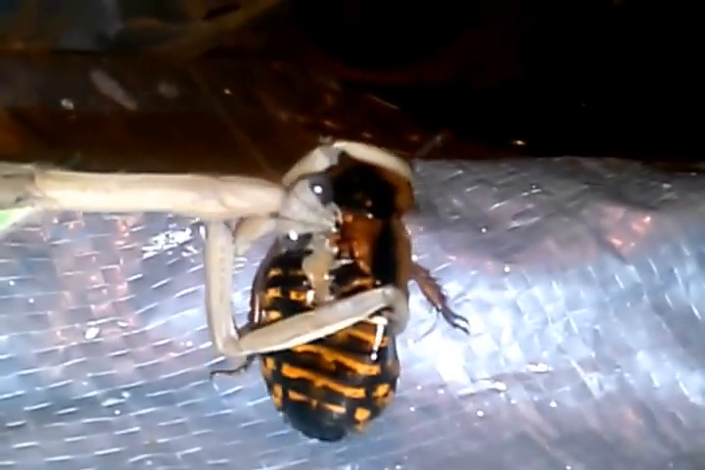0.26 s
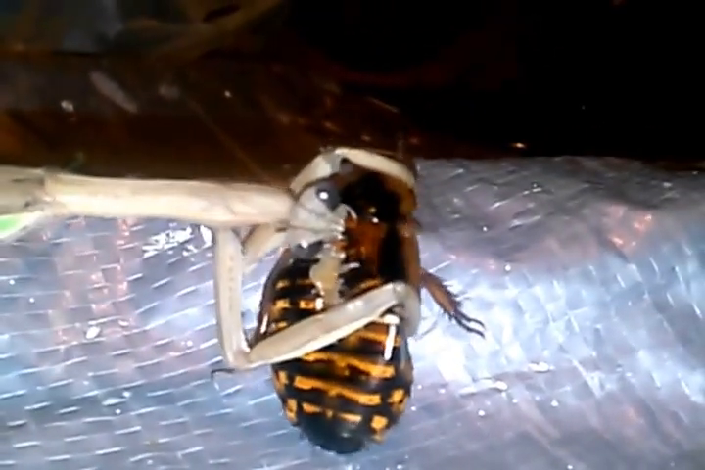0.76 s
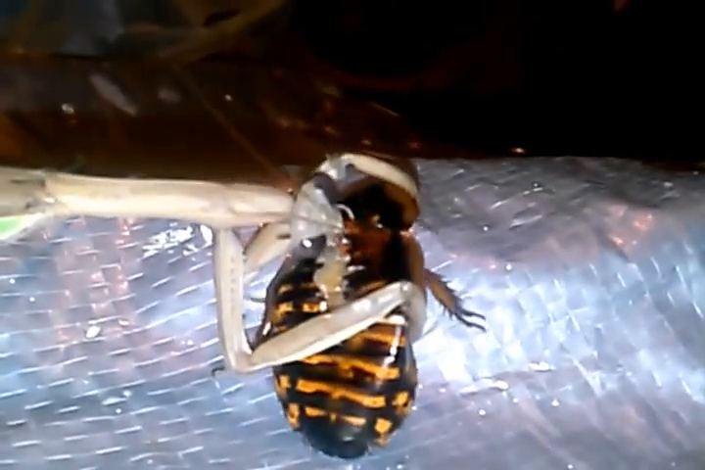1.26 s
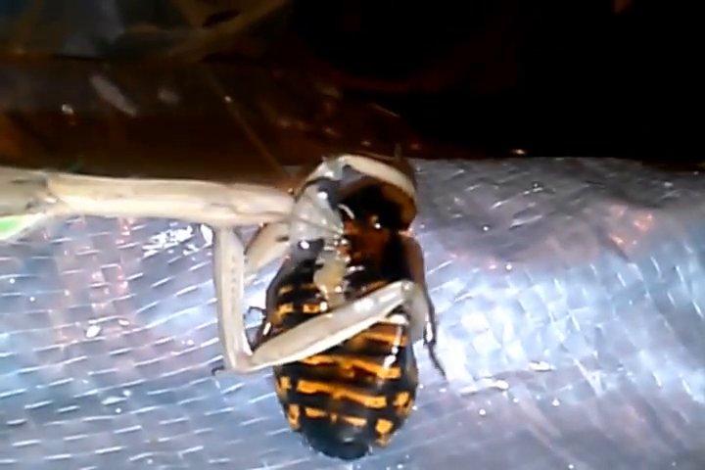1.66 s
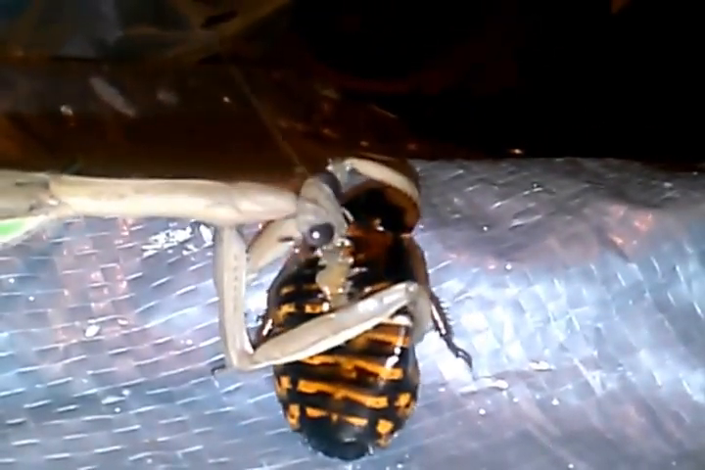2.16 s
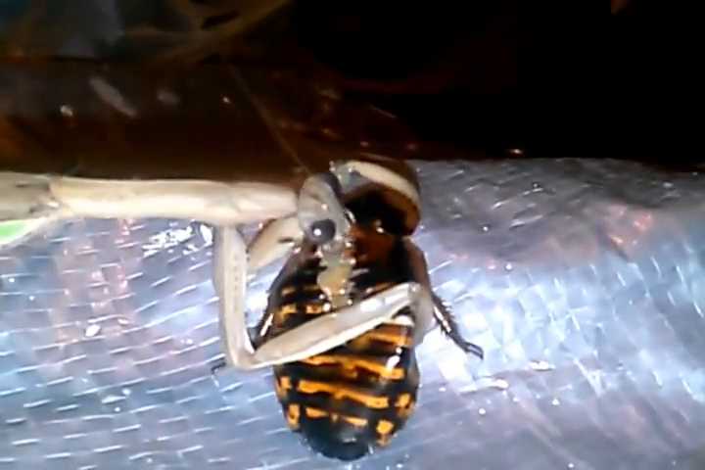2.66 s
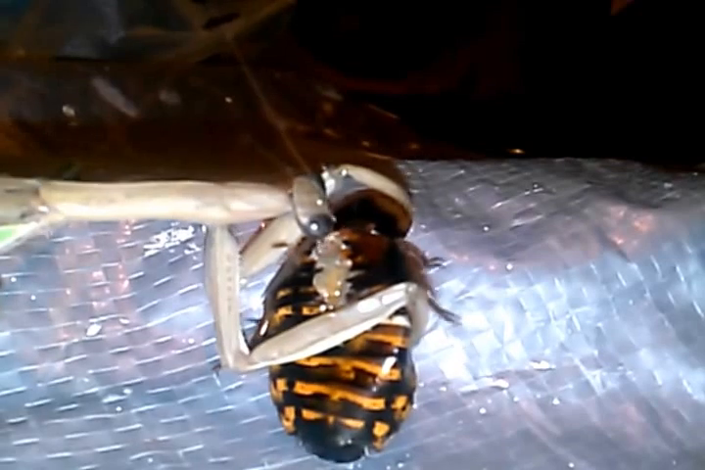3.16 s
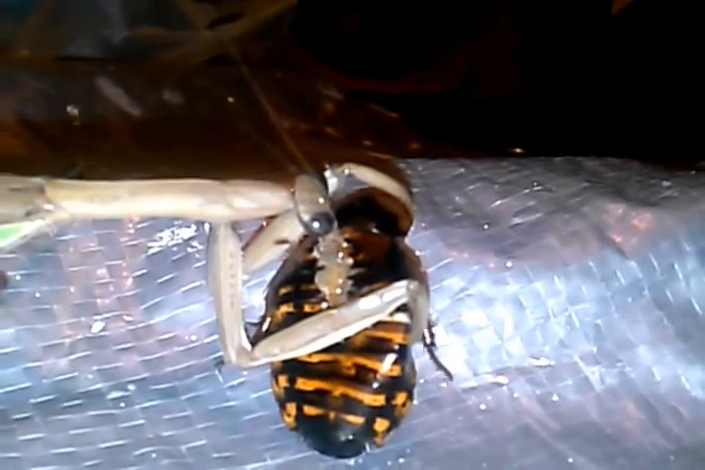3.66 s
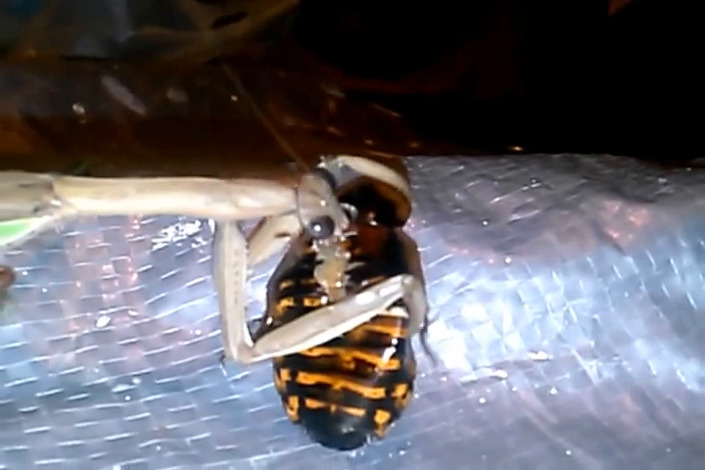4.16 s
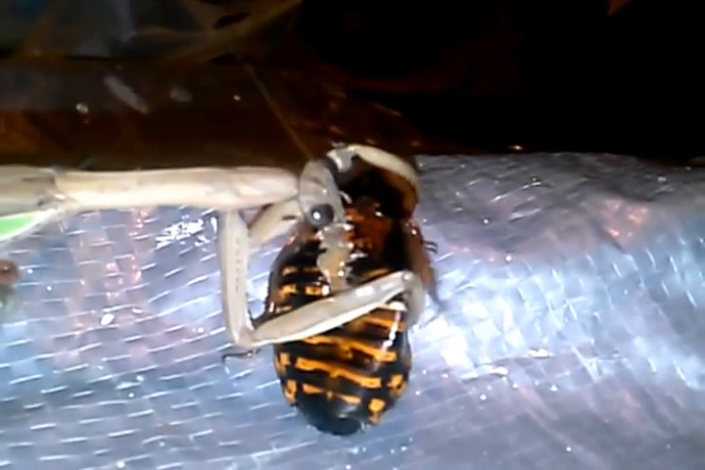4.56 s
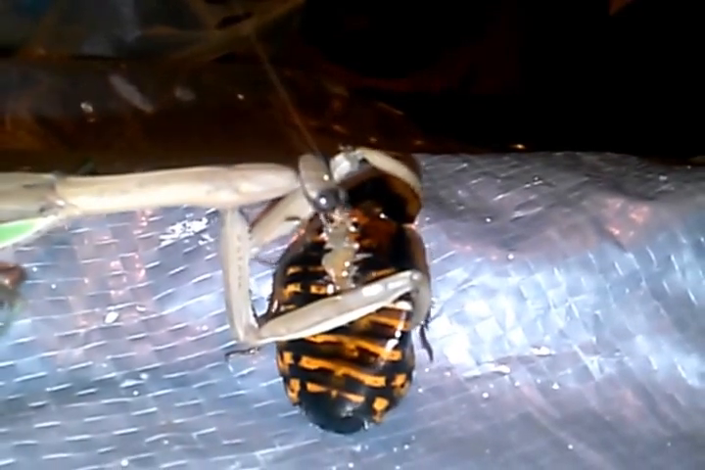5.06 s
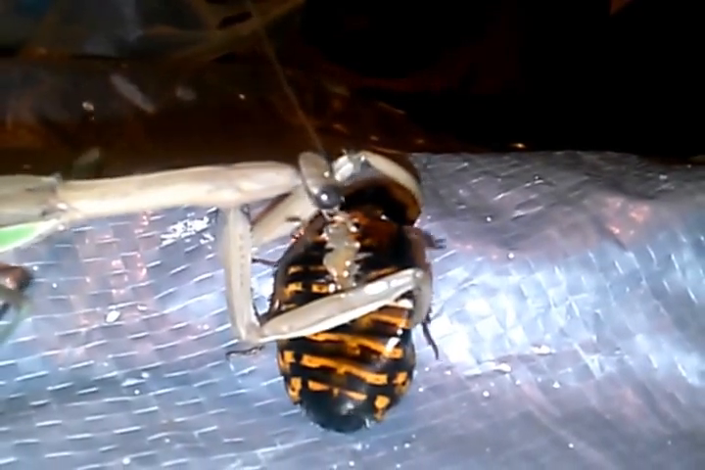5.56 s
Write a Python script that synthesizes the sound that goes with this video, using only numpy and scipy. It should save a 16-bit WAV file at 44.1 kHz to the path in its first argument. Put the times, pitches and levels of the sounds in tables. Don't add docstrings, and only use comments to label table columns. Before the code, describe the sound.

A low, shaky rumble and a distant airy hiss run throughout, as in a small room with a handheld camera. From 0.1 to 0.3 s fingers bump and rub the case; it gives a tiny chirp at 0.13 and a falling creak until 0.25, mixed with two small shell cracks. Another faint crack comes at 0.4, then the sharpest crunch at 0.56 with a low thump. At 0.8 the strongest dull knock lands, with a weak crack and soft rub. Afterward the mantis's bites are sparse: faint dry ticks at 1.6, 2.6 and 3.3, a brighter, clear snap at 3.65 with a dull tap, then weaker ones at 4.4, 4.7 and 5.2. A low tap falls at 2.7 and a soft deep swing at 5.05. Thin, wavering whistles flicker inside the hiss. The background is patchy, dipping around 4.0 to 4.2 and sinking at the end, about 5.8 s.

```python
import sys
import numpy as np
from scipy import signal
from scipy.fft import rfft, irfft, next_fast_len
from scipy.io import wavfile
from scipy.ndimage import map_coordinates

SR = 44100
rng = np.random.default_rng(int(sys.argv[2]) if len(sys.argv) > 2 else 0)


def wrap_up_sound(samples):
    columns = np.atleast_2d(samples).T
    tamed = np.clip(columns, -1, 1)
    steps = np.round(tamed * 32767).astype(np.int16)
    wavfile.write(sys.argv[1], SR, steps)


def field_ratio(decibels):
    return 10 ** (np.asarray(decibels, dtype=float) / 20)


N = 256662

# (time [s], level [dB], brightness [dB])
ROOM_DRONE = [(0, -58, 5.5), (.2, -49.5, -3), (.55, -53.5, 3.5), (.8, -50, -1), (1.2, -55.5, 1),
              (1.7, -54, 0), (2.0, -50.5, -5), (2.25, -54, 4.5), (2.6, -50, -3), (3.2, -55, 4),
              (3.5, -52, 2.5), (3.85, -54.5, -0.5), (4.35, -50.5, -3.5), (4.65, -49.5, 1), (4.9, -49, -4),
              (5.1, -53, 3), (5.4, -51, -2.5), (5.82, -56.5, 6.5)]


def in_time(rows):
    s, *columns = np.transpose(rows)
    return [np.interp(np.arange(N) / SR, s, c) for c in columns]


def rms_one(x):
    return x / np.sqrt(np.mean(x ** 2) + 1e-20)


def drift(rate):
    r = np.exp(-80 * np.pi * rate / SR)
    sparse = rng.standard_normal(N // 40 + 2002)
    slow = signal.lfilter([1], [1, -2 * r, r * r], sparse)[2000:]
    return np.interp(np.arange(N) / 40, np.arange(len(slow)), rms_one(slow))


def ring(clicks, hz, t60):
    r = field_ratio(-60 / (t60 * SR))
    w = 2 * np.pi * hz / SR
    return signal.lfilter([0, np.sin(w)], [1, -2 * r * np.cos(w), r * r], clicks)


def patchy_noise(spectrum, shared_db, own_db, rate, tilt_db=lambda hz: 0):
    size = next_fast_len(N)
    points = np.array(spectrum)
    point_octave = np.log2(points[:, 0])
    octave = np.log2(np.maximum(np.arange(size // 2 + 1) * SR / size, 1))
    colour = field_ratio(np.interp(octave, point_octave, points[:, 1]))
    noise = rfft(rng.standard_normal(size)) * colour
    noise /= np.std(irfft(noise, size))
    out = 0
    together = drift(rate)
    for centre in np.arange(point_octave[0], point_octave[-1] + .5, .5):
        triangle = np.maximum(1 - 2 * abs(octave - centre), 0)
        band = irfft(noise * triangle, size)[:N]
        out = out + band * field_ratio(shared_db * together + own_db * drift(rate) + tilt_db(2 ** centre))
    return out


def crunches():
    # (time [s], peak [dB], ring [Hz], brightness [dB])
    cracks = [(0.176, -37, 1300, -22), (0.193, -31, 1130, -13), (0.377, -41, 870, -16),
              (0.556, -28, 950, -22), (0.786, -44, 1100, -16), (1.631, -40.5, 1320, -17),
              (2.579, -40, 1250, -19), (3.316, -43, 1320, -16), (3.65, -30, 1150, -3),
              (4.444, -41, 1500, -10), (4.744, -43, 710, -26), (5.187, -47, 767, -18)]
    out = np.zeros(N)
    chance = rng.random((len(cracks), 8))
    for (s, peak_db, hz, bright_db), draw in zip(cracks, chance):
        clicks = np.zeros(2000)
        clicks[0] = 1
        later = (SR * (.0004 + .002 * draw[:3])).astype(int)
        clicks[later] = 0.25 * (2 * draw[3:6] - 1)
        t60 = .011 * np.clip(-bright_db / 12, .42, 1.3)
        contact = np.hanning(round(-bright_db * .00004 * SR) + 2)
        high = ring(clicks, 2680, 0.74 * t60)
        high = high - .5 * ring(clicks, 3300, 0.36 * t60) + .6 * ring(clicks, 5000, 0.71 * t60)
        low = ring(signal.lfilter(contact / contact.sum(), 1, clicks), hz, t60)
        crack = low - field_ratio(bright_db + 3.0) * high
        out[round((s + .0010) * SR):][:2000] += field_ratio(peak_db + 4.5) * crack
    return out


def bumps():
    # (time [s], peak [dB], swing [Hz], 60 dB decay [s])
    pushes = [
        (.096, -24, 90.5, .06),
        (0.221, -22, 29.6, 0.13),
        (0.561, -21.5, 50, 0.062),
        (0.808, -15.5, 104, 0.037),
        (.855, -22, 45, 0.036),
        (1.335, -32.5, 216, 0.053),
        (2.689, -29, 60, 0.06),
        (3.644, -30, 91, 0.034),
        (5.05, -28, 42.5, 0.27),
    ]
    out = np.zeros(N)
    for s, peak_db, hz, t60 in pushes:
        push = np.zeros(8000)
        push[:100] = np.hanning(100) / 50
        out[round(s * SR):][:8000] += field_ratio(peak_db) * ring(push, hz, t60)
    return out


def creak():
    # (time [s], pitch [Hz], level [dB])
    slips = [
        [(.122, 322, -69), (.131, 316, -32.5), (.139, 317, -32.5), (.150, 330, -65)],
        [(.172, 340, -38), (.180, 338, -35), (.187, 359, -45), (.197, 340, -34), (.210, 281, -32),
         (.220, 257, -27), (.234, 233, -31), (.244, 231, -33), (.254, 225, -57)],
    ]
    out = np.zeros(N)
    t = np.arange(N) / SR
    for rows in slips:
        hz, level_db = in_time(rows)
        sounding = (t > rows[0][0]) & (t < rows[-1][0])
        phase = 2 * np.pi * np.cumsum(hz * sounding) / SR
        tone = np.sin(phase) + .06 * np.sin(2 * phase) + .1 * np.sin(3 * phase) + .03 * np.sin(4 * phase)
        out += sounding * field_ratio(level_db + 2.5 + 2.0 * drift(150)) * tone
    return out


def narrow_bands(rows):
    out = np.zeros(N)
    chance = rng.standard_normal((len(rows), 2, 14000))
    for (s, length, hz, width_hz, level_db), (a, b) in zip(rows, chance):
        size = min(round(length * SR), 12000)
        r = np.exp(-np.pi * width_hz / SR)
        waver = signal.lfilter([1], [1, -2 * r, r * r], a + 1j * b)[2000:2000 + size]
        sagging_hz = hz * (1 - .03 * np.arange(size) / SR)
        carrier = np.exp(2j * np.pi * np.cumsum(sagging_hz) / SR)
        band = np.sqrt(np.hanning(size)) * rms_one((waver * carrier).real)
        out[round(s * SR):][:size] += field_ratio(level_db) * band
    return out


def rubs():
    # (time [s], length [s], centre [Hz], width [Hz], level [dB])
    strokes = [
        (0.061, 0.019, 960, 40, -48),
        (0.103, 0.098, 993, 30, -54.5),
        (0.198, 0.11, 1005, 250, -48),
        (0.307, 0.28, 1075, 300, -61),
        (0.759, 0.092, 1080, 250, -55),
    ]
    return narrow_bands(strokes)


def rumble():
    # (time [s], level [dB])
    hand = [(0.0, -42.5), (0.52, -44.5), (0.79, -45), (1.47, -44.5), (1.88, -47.5), (2.16, -45),
            (2.98, -47.5), (3.52, -43.5), (3.81, -52.5), (4.3, -48.5), (4.47, -45), (4.81, -47.5),
            (5.25, -47.5), (5.82, -45.5)]
    # (frequency [Hz], density [dB per Hz])
    tremor_colour = [(4, -3.5), (7, 2), (20, 0), (30, -12), (45, -11), (80, -13.5), (150, -16), (215, -18),
                     (250, -34), (330, -85)]
    # (frequency [Hz], density [dB per Hz])
    drone_colour = [(130, -28), (225, -2.5), (290, 0), (324, -2.5), (360, -1.5), (417, -10.5), (514, -8.5),
                    (648, -13), (745, -11), (1070, -21), (1200, -26), (1560, -49), (2640, -120)]
    (tremor_db,) = in_time(hand)
    drone_db, upper_db = in_time(ROOM_DRONE)
    duck_db = ducking()
    tremor = patchy_noise(tremor_colour, shared_db=2.5, own_db=2.5, rate=17.0)
    tremor = field_ratio(tremor_db + 0.79 * duck_db + 4.5) * tremor
    drone = patchy_noise(drone_colour, shared_db=1.72, own_db=1.1, rate=12.3,
                         tilt_db=lambda hz: upper_db * (hz > 420))
    drone = mottled(drone, depth_db=2.5, patch_hz=60, patch_s=.07)
    return tremor + field_ratio(drone_db + 0.84 * duck_db + 3.0) * drone


def hiss():
    # (time [s], level [dB], brightness [dB])
    swell = [(0, -51.5, -6.5), (.33, -48.5, -3), (.35, -48, 1.5), (.63, -48.5, -1), (.85, -49, -11),
             (1.02, -51, -14), (1.08, -48, 1), (1.3, -49, 0.5), (1.62, -44, 1.5), (1.82, -49, -2),
             (2.38, -50, -3.5), (2.5, -46, 2.5), (3.1, -47, 0), (3.42, -44.5, 1), (3.8, -48, 3),
             (4.6, -48, 0.5), (5.0, -49, 4), (5.82, -48, -1.5)]
    # (frequency [Hz], density [dB per Hz])
    hiss_colour = [(650, -16), (1100, -23.5), (1340, -8.5), (1590, -12), (2310, -9), (2950, 0), (3940, -6),
                   (4450, 0), (5090, 1.5), (7930, -4), (14100, -20), (15600, -23.5)]
    hiss_db, bright_db = in_time(swell)
    drone_db, upper_db = in_time(ROOM_DRONE)
    duck_db = ducking()
    top_db = bright_db + 0.1 * duck_db
    room_db = drone_db + upper_db
    valley_db = 1 + (0.36 - 1) * (hiss_db - hiss_db.mean()) + 0.37 * (room_db - room_db.mean())

    def tilt_db(hz):
        return top_db * np.clip(np.log2(hz / 6000) / .6, 0, 1) + valley_db * (hz < 2300)

    noise = patchy_noise(hiss_colour, shared_db=0.78, own_db=0.72, rate=20.5, tilt_db=tilt_db)
    return field_ratio(hiss_db + duck_db + 0.73) * mottled(noise, depth_db=3.0, patch_hz=50, patch_s=.12)


def whistles():
    # (time [s], length [s], pitch [Hz], level [dB])
    calls = [(0.106, .07, 4380, -52), (0.473, 0.23, 3050, -58), (0.523, 0.086, 4380, -53),
             (1.065, 0.076, 3230, -53), (1.093, 0.087, 4620, -48.5), (1.397, 0.036, 3170, -52),
             (1.476, 0.07, 2850, -54), (1.679, 0.13, 3040, -53.5), (1.809, 0.2, 2960, -54),
             (2.131, 0.047, 4430, -51), (2.287, 0.13, 3180, -49.5), (2.822, 0.15, 3190, -56),
             (2.848, 0.2, 2970, -59), (2.897, 0.064, 4600, -48), (3.258, .12, 3010, -56),
             (3.348, 0.15, 4880, -52), (3.499, .06, 2980, -54), (3.524, 0.067, 6000, -49),
             (4.37, 0.077, 3000, -57), (4.65, 0.16, 2990, -52), (5.04, 0.18, 2870, -60),
             (5.065, .08, 4350, -58), (5.346, 0.28, 2934, -54), (5.633, 0.065, 2990, -53.5)]
    rows = []
    for s, length, hz, level_db in calls:
        width_hz = 100 * (hz / 3000) ** 3.2
        rows.append((s, length, hz, width_hz, level_db))
    return narrow_bands(rows)


def self_noise():
    band = signal.butter(1, [5000, 11000], "band", fs=SR, output="sos")
    return field_ratio(-66.0) * rms_one(signal.sosfilt(band, rng.standard_normal(N)))


def mottled(x, depth_db, patch_hz, patch_s):
    cells = signal.stft(x, nperseg=1024)[2]
    field = rng.standard_normal(cells.shape)
    pitch = np.arange(cells.shape[0])[:, None] * SR / 1024 / patch_hz + 0 * field
    time = np.arange(cells.shape[1]) * 512 / SR / patch_s + 0 * field
    field = rms_one(map_coordinates(field, [pitch, time], order=1, mode="wrap"))
    field *= np.clip(np.linspace(2, -2.5, len(field)), .35, 1)[:, None]
    patched = signal.istft(cells * field_ratio(depth_db * field), nperseg=1024)[1][:N]
    return rms_one(patched) * np.std(x)


def ducking():
    # (time [s], length [s], gain [dB])
    ducks = [(.70, 0.068, -3), (.91, 0.03, -5), (1.004, 0.14, -2.5), (1.287, .12, -1.5), (1.652, .06, -3),
             (1.77, 0.11, -2), (1.922, 0.062, -4), (2.04, 0.072, -3), (2.20, 0.056, -1.5),
             (2.613, 0.1, -1.5), (2.72, .06, 0.5), (2.789, 0.14, -3), (2.936, .05, 3), (3.587, 0.13, -2.5),
             (3.687, .06, 4), (3.754, 0.11, -1.5), (3.99, 0.16, -5.5), (4.208, 0.14, -4),
             (4.81, 0.19, -1.5), (4.965, 0.069, -2.5), (5.093, 0.09, 2), (5.17, 0.064, -3),
             (5.273, .08, -2.5), (5.457, 0.13, -2), (5.544, 0.073, 1.5), (5.603, 0.065, -2),
             (5.748, .14, -7.5), (5.83, 0.066, -7)]
    s, length, gain_db = np.transpose(ducks)[:, :, None]
    t = np.arange(0, N + 64, 64) / SR
    bells = gain_db * np.cos(np.pi * np.clip((t - s) / length / 1.25, -.5, .5)) ** 2
    return np.interp(np.arange(N) / SR, t, bells.sum(axis=0))


def scene():
    near = crunches() + bumps() + creak() + rubs()
    background = rumble() + hiss() + whistles() + self_noise()
    return np.tile(near + background, (2, 1))


def roll_off(x):
    return signal.sosfilt(signal.butter(12, 15760, fs=SR, output="sos"), x)


def record(dry):
    return roll_off(dry - .001)


dry = scene()
out = record(dry)
wrap_up_sound(out)
```